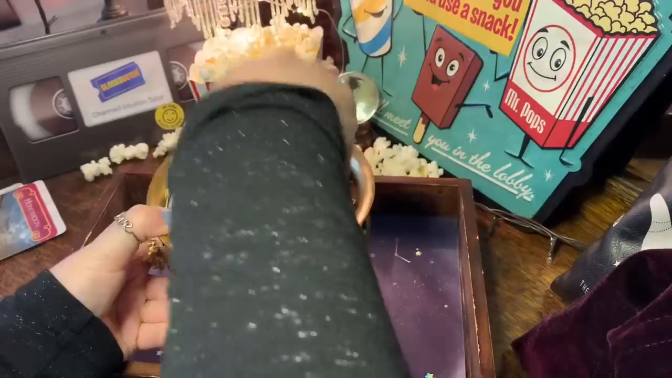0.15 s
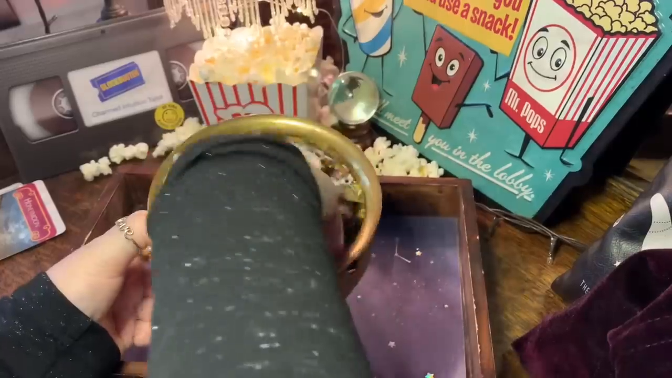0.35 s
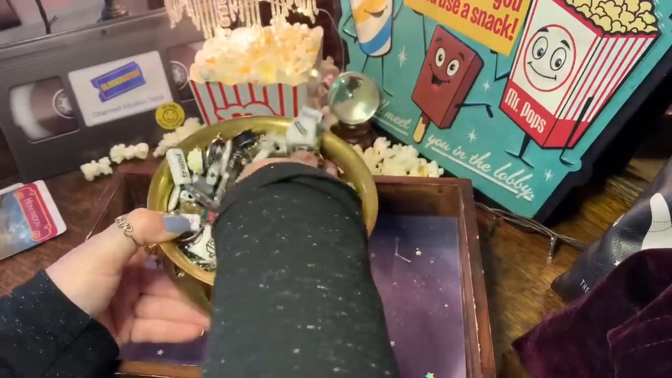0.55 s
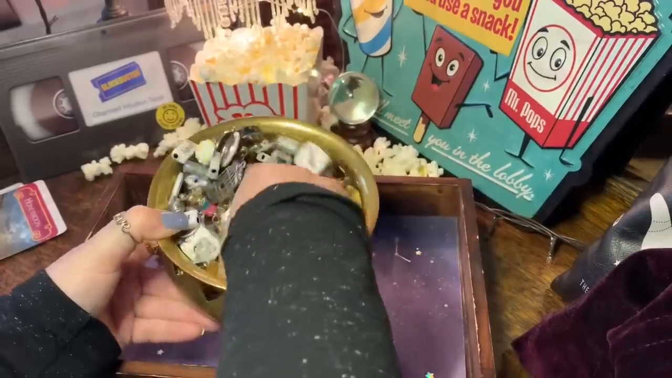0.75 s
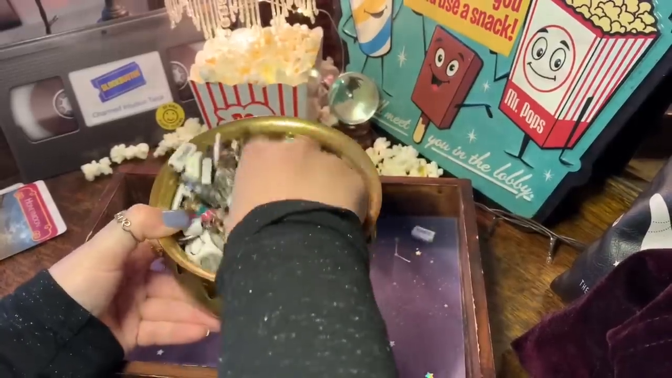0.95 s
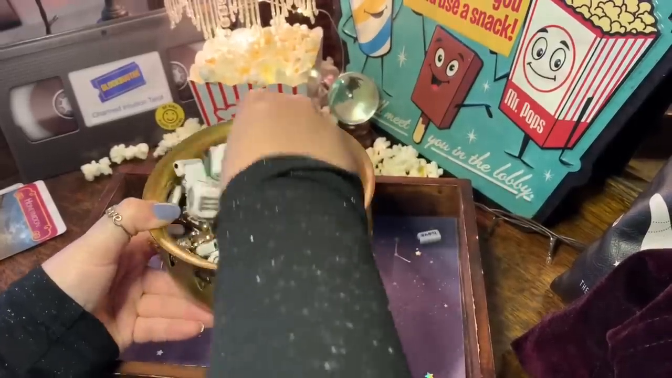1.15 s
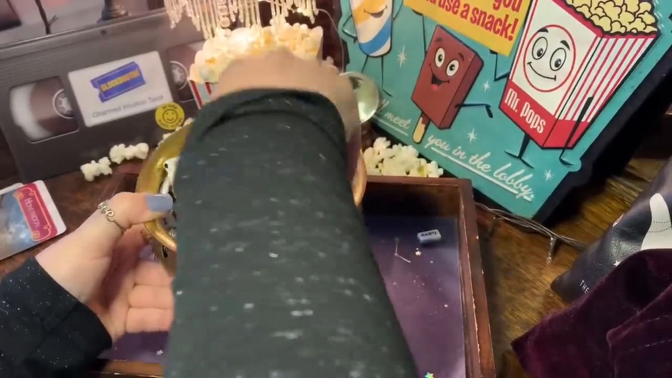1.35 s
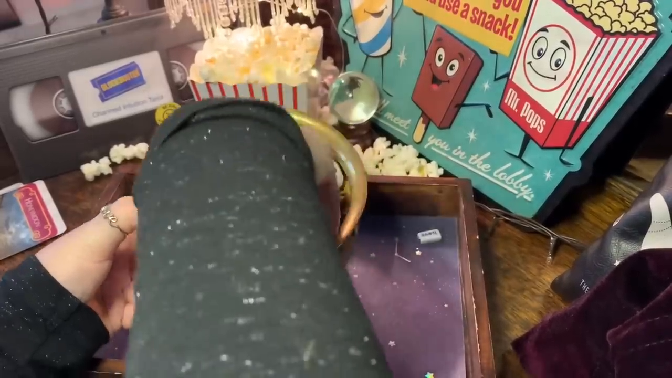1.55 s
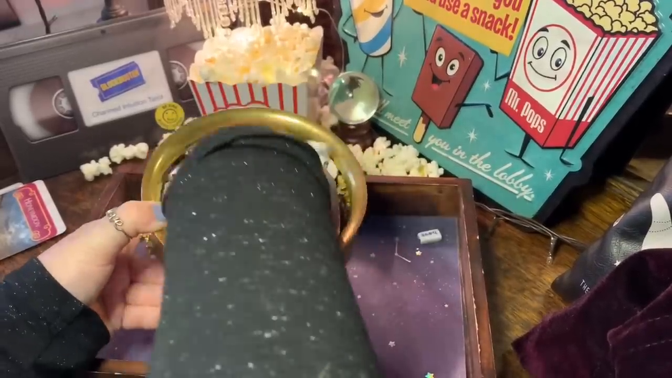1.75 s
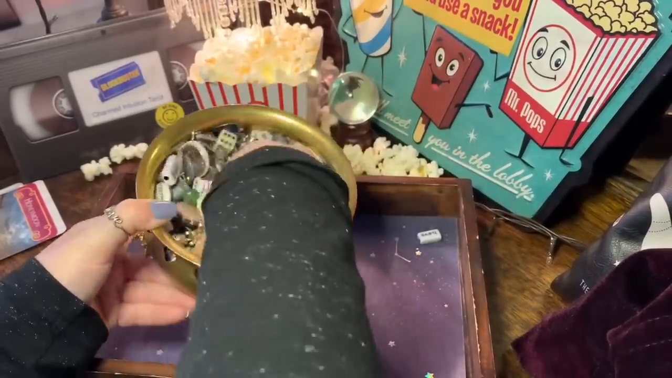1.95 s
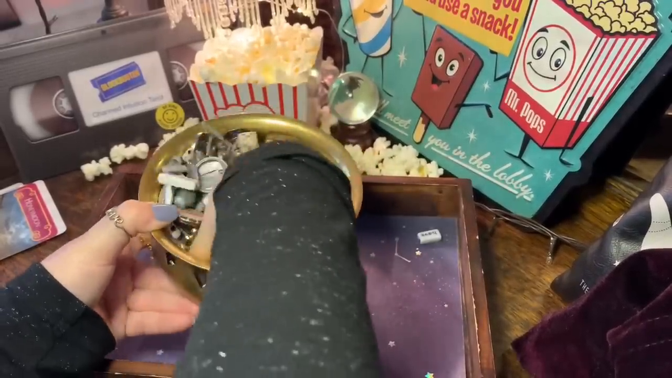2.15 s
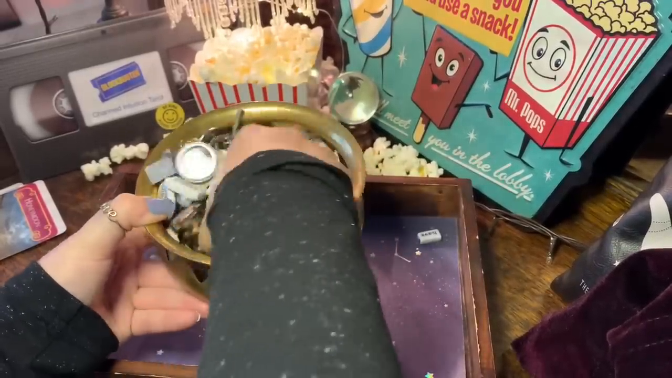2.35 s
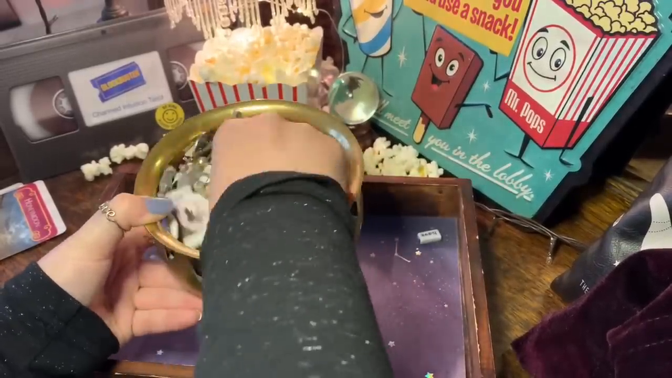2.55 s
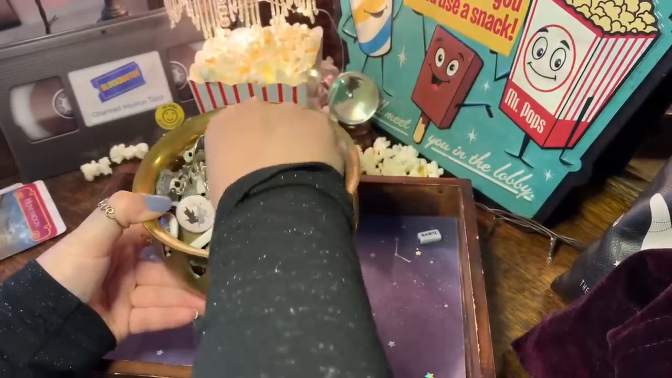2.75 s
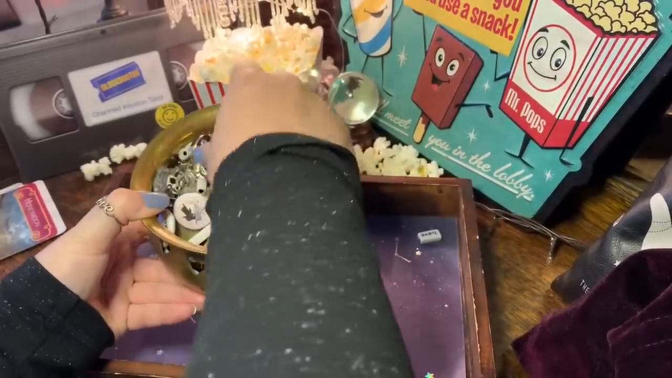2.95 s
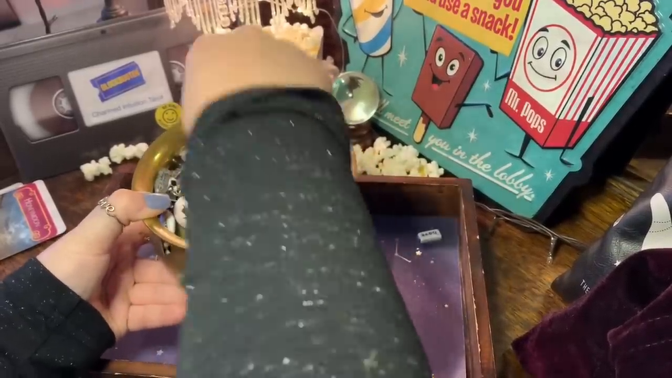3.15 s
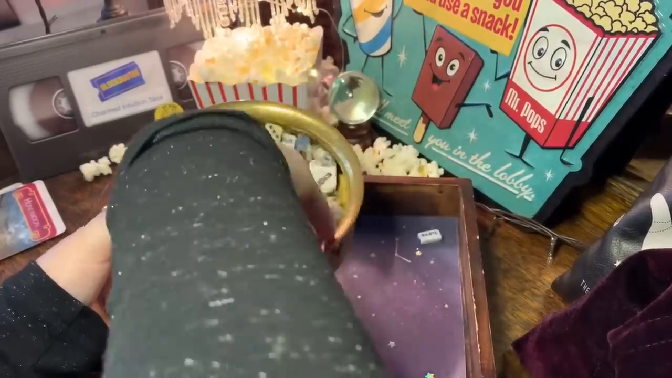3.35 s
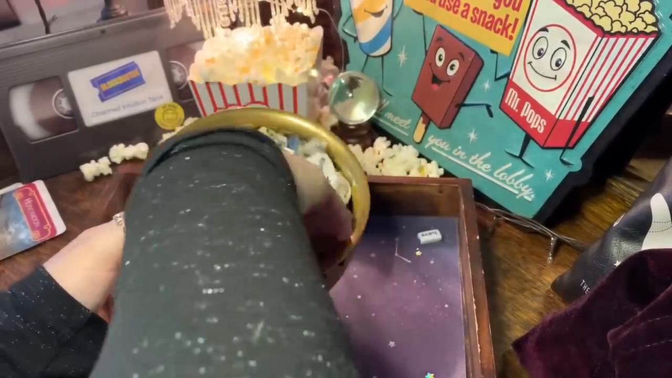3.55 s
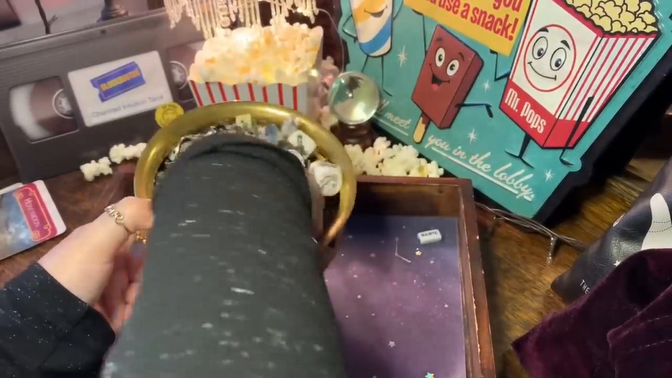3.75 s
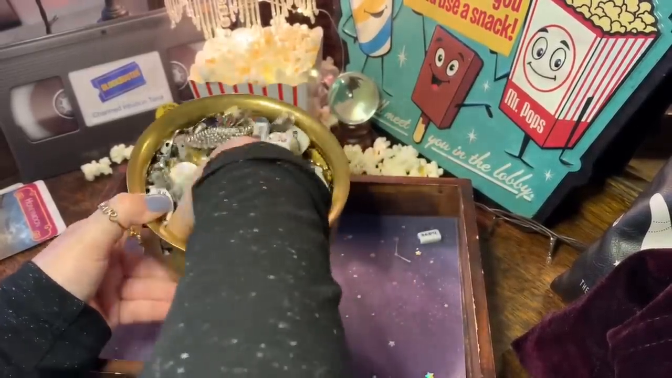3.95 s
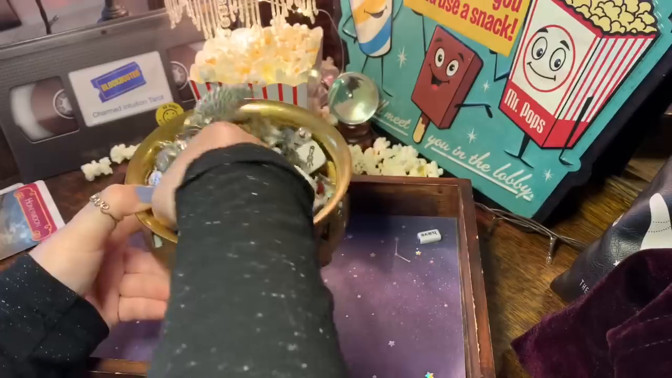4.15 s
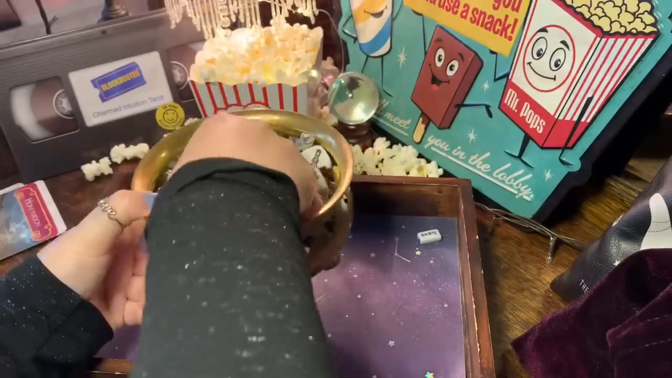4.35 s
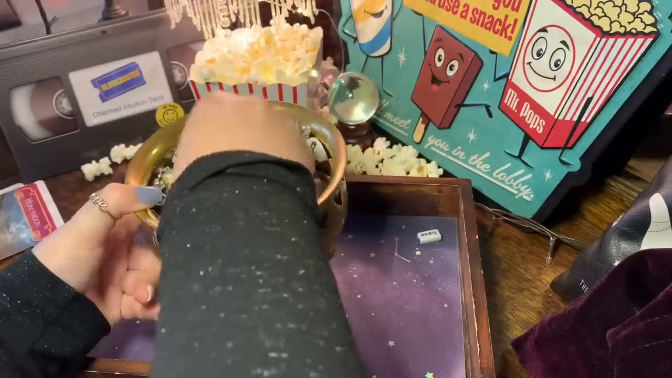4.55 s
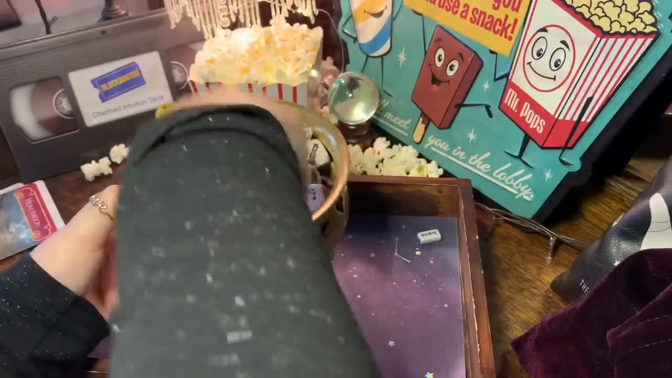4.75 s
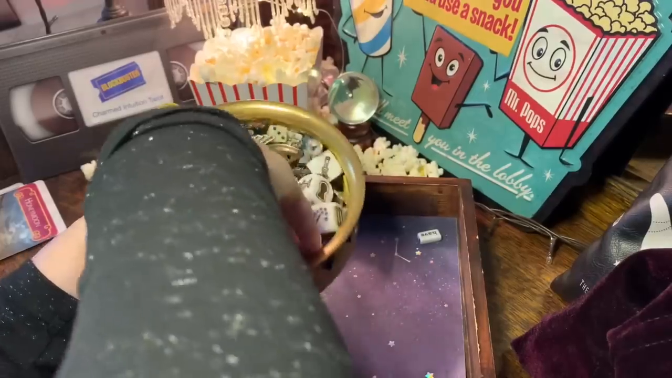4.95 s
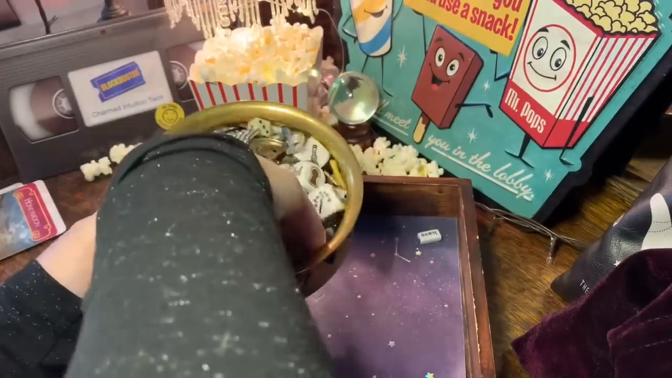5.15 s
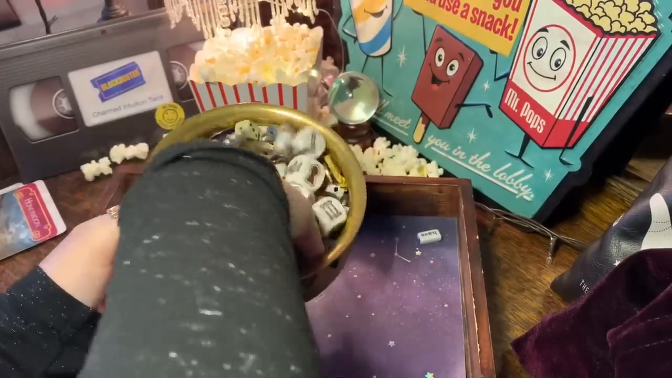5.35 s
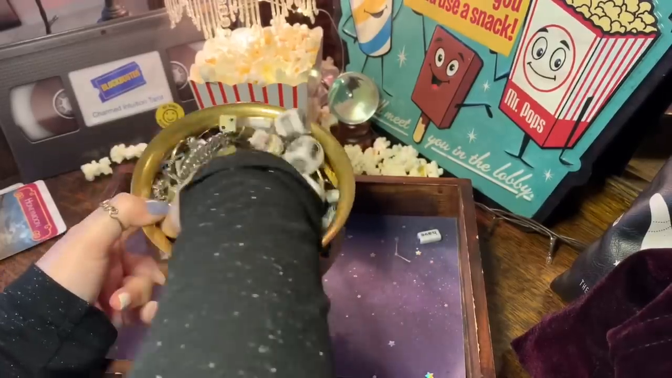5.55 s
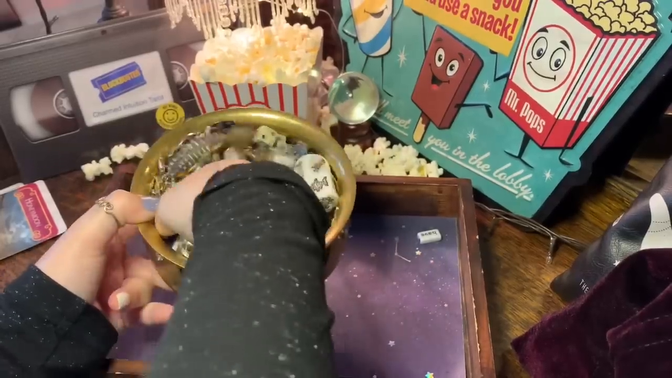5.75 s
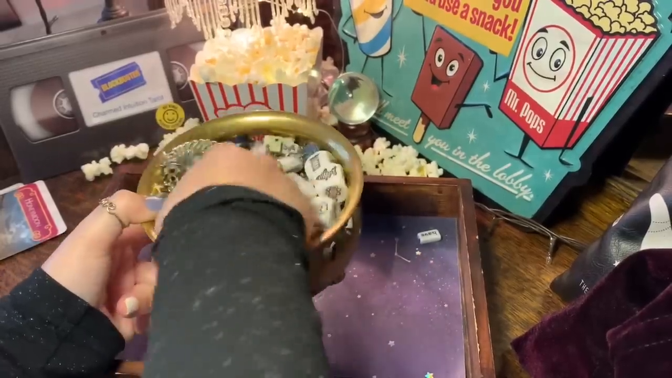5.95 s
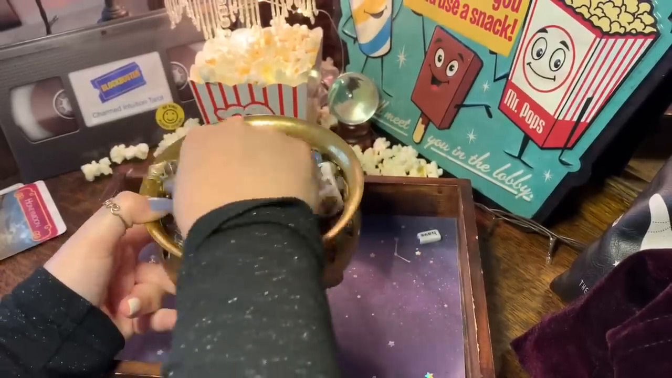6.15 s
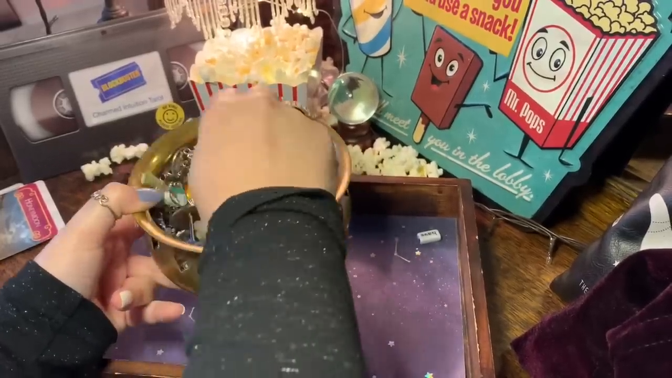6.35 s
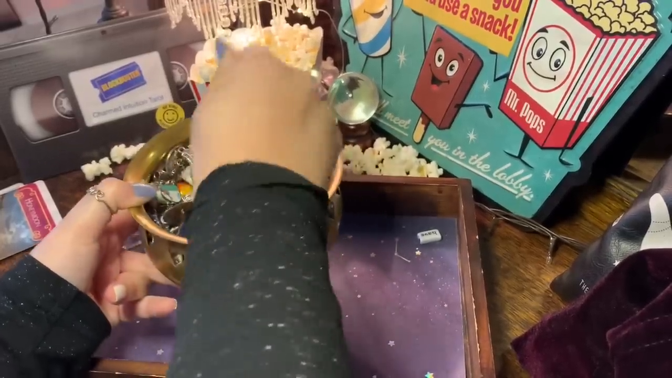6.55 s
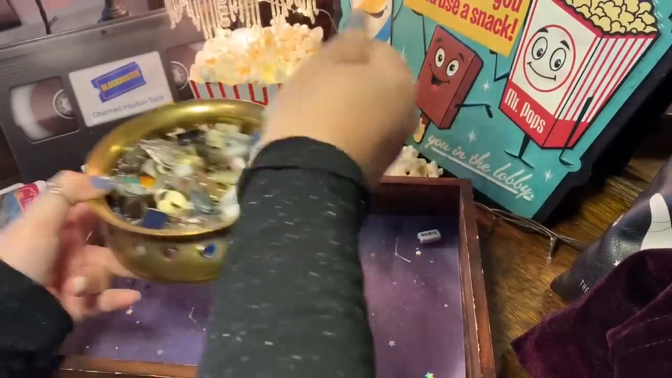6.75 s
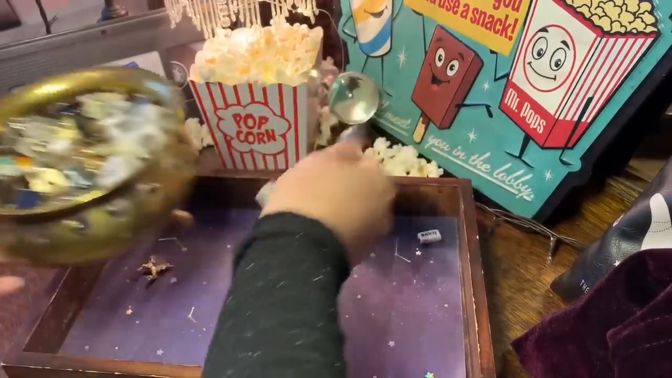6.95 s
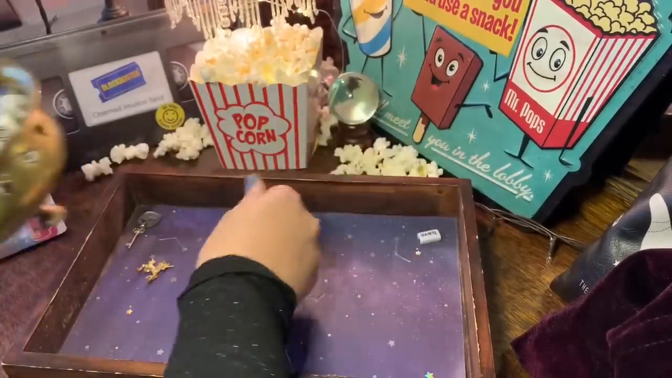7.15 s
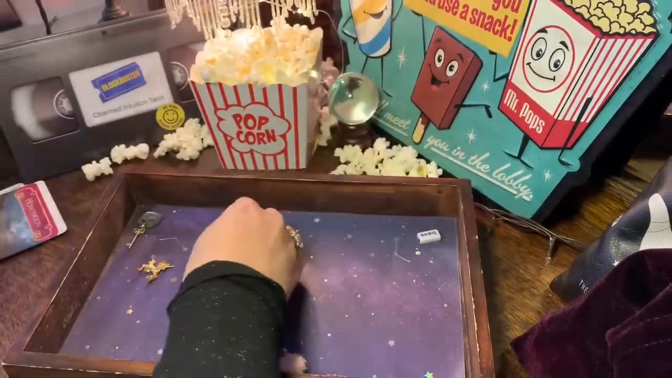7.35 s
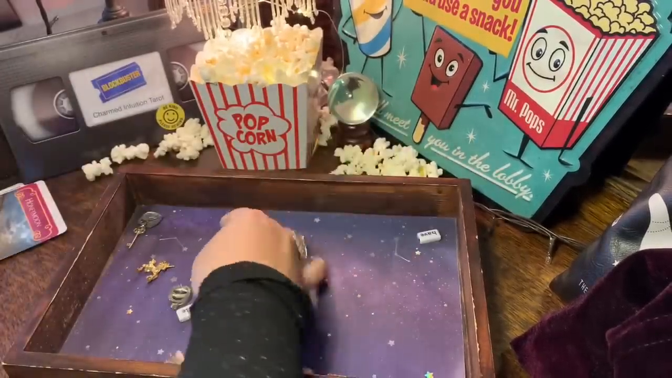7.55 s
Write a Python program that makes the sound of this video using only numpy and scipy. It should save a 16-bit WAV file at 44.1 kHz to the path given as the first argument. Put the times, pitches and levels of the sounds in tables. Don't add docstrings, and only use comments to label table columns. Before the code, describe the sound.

Close up in a quiet room, a hand churns a heap of small metal charms and tiles in a brass bowl. Continuous bright, shimmering jangle surges with uneven strokes, punctuated by sharp clinks and duller clacks. A few strays thud softly on a wooden tray midway. The stirring stops abruptly, leaving faint room hum, then a handful drops onto the felt-lined tray in a brief clatter.

```python
import sys
import numpy as np
from scipy import signal
from scipy.fft import rfft, irfft, next_fast_len
from scipy.io import wavfile

SR = 44100
rng = np.random.default_rng(int(sys.argv[2]) if len(sys.argv) > 2 else 0)


def nominal_scale(level):
    x = np.asarray(level, float) / 20
    return 10 ** x


def int16_out(signal):
    q = np.round(np.clip(np.atleast_2d(signal).T, -1, 1) * 32767)
    wavfile.write(sys.argv[1], SR, q.astype(np.int16))


N = 336041

# peak time in seconds, level in dB,
# seconds to rise 10 dB, seconds to fall 10 dB, lead of tiles over charms in dB.
HANDFUL_PUSHES = [
    (6.444, -38.5, 0.006, 0.062, -4.5),
    (7.13, -43.5, 0.0044, 0.2, 4.5),
    (7.24, -34.5, 0.038, 0.063, 0.5),
    (7.41, -29.5, 0.047, 0.085, -6),
]
TILES_DB, TILES_FOLLOW = -4, 0.4


def rms_one(x):
    return x / np.sqrt(np.mean(x ** 2) + 1e-20)


def levelled(sound, strength):
    return sound * np.sqrt(np.mean(strength ** 2) / np.mean(sound ** 2))


def in_time(rows):
    s, *columns = np.transpose(rows)
    return [np.interp(np.arange(N) / SR, s, c, -120, -120) for c in columns]


def at_hz(points, hz):
    f, values = np.array(points)[:, 0], np.array(points)[:, 1]
    return np.interp(np.log(hz), np.log(f), values)


def add(out, s, sound):
    i = round(s * SR)
    out[:, i:i + sound.shape[1]] += sound[:, :N - i]


def drift(rate):
    r = np.exp(-80 * np.pi * rate / SR)
    slow = signal.lfilter([1], [1, -2 * r, r * r], rng.standard_normal(N // 40 + 2002))[2000:]
    return np.interp(np.arange(N) / 40, np.arange(len(slow)), rms_one(slow))


def ring(clicks, hz, t60):
    r, w = nominal_scale(-60 / (t60 * SR)), 2 * np.pi * hz / SR
    return signal.lfilter([0, np.sin(w)], [1, -2 * r * np.cos(w), r * r], clicks + 1e-18)


def body(clicks, modes):
    return sum(nominal_scale(db) * ring(clicks, hz, t60) for hz, db, t60 in modes)


def heap(clicks, spectrum, cycles, count):
    pitches = np.geomspace(spectrum[0][0], spectrum[-1][0], count) * rng.uniform(0.95, 1.006, count)
    t60s = cycles / pitches * np.exp(0.27 * rng.standard_normal(count))
    dealt = rng.integers(0, 9, N)
    piles = [clicks * (dealt == k) * nominal_scale(2.5 * drift(9)) for k in range(9)]
    total = 0
    for k, (hz, t60) in enumerate(zip(pitches, t60s)):
        level = nominal_scale(at_hz(spectrum, hz)) * np.sqrt(hz / t60)
        total = total + ring(piles[k % 9], hz, t60) * level
    return total


def collisions(per_s, spread_db, clump_db):
    born = rng.random((2, N)) < per_s / SR
    sizes = nominal_scale(spread_db * np.minimum(rng.exponential(1, (2, N)), 4)) * rng.choice([-1, 1], (2, N))
    return rms_one(born * sizes * nominal_scale(clump_db * drift(43)))


def dry_edge(clicks, low_hz=3200, high_hz=15000):
    return signal.sosfilt(signal.butter(2, [low_hz, high_hz], "band", fs=SR, output="sos"), clicks)


def burst(length_s, decay_s):
    t = np.arange(int(length_s * SR)) / SR
    contacts = rng.standard_normal((2, len(t))) * nominal_scale(3.9 * rng.standard_normal(len(t)))
    envelope = np.exp(-t / decay_s) * (1 - np.exp(-t / (0.6 * decay_s)))
    return rms_one(contacts * envelope) / np.sqrt(len(t))


def pushes(rows, offset_db, follow):
    t = np.arange(0, N + 32, 32) / SR
    power = 0
    for s, db, rise_s, fall_s, lean_db in rows:
        drop_db = 10 * np.maximum((s - t) / max(rise_s, 0.002), (t - s) / max(fall_s, 0.01))
        power = power + nominal_scale(2 * (db + offset_db + follow * lean_db - drop_db))
    return np.interp(np.arange(N) / SR, t, np.sqrt(power))


def hand_in():
    hand_out_s, stop_db_per_s = 6.39, 300
    return nominal_scale(-stop_db_per_s * np.maximum(np.arange(N) / SR - hand_out_s, 0))


def stirring(offset_db, follow):
    # peak time in seconds, level in dB, seconds to rise 10 dB,
    # seconds to fall 10 dB, how hard the hand bears on the bowl in dB.
    strokes = [(.035, -26.5, .4, 0.075, -4.5), (.275, -25, 0.07, 0.24, -2.5), (.458, -26.5, 0.03, 0.08, -4),
               (.7, -26, 0.14, 0.0858, 4.5), (.92, -23, 0.09, 0.15, -1.5), (1.24, -28.5, 0.04, 0.07, -6.5),
               (1.56, -27, 0.1, 0.07, -1), (1.63, -35, 0.04, 0.06, -1.5), (1.91, -23, 0.0261, 0.11, 3.5),
               (2.1, -25, 0.0455, -0.03, 2), (2.26, -26, 0.0457, 0.1, 3.5), (2.42, -27, 0.1242, 0.32, 4),
               (2.96, -25.5, -0.01, 0.12, -3), (3.35, -25, 0.07, 0.07, 2), (3.54, -26.5, 0.05, 0.17, 1.5),
               (3.71, -25, 0.02, 0.16, 1.5), (4.04, -24, 0.11, 0.25, -0.5), (4.42, -34.5, 0.34, 0.1, -2.5),
               (4.6, -32, 0.15, 0, 1), (4.855, -30, 0.07, 0.07, 7), (5.15, -35.5, 0.1, 0.5, 2),
               (5.28, -31, 0.03, 0.15, 1.5), (5.395, -22.5, 0.0153, 0.29, -1),
               (6.0, -25, 0.2049, 0.11, 1.5), (6.25, -32.5, 0.07, 0.17, -5.5)]
    rustle = nominal_scale(-50.5 + offset_db)
    return hand_in() * np.hypot(pushes(strokes, offset_db, follow), rustle)


def all_slumps():
    # time in seconds, peak in dB, charms in relative dB, bowl in relative dB.
    hard_slumps = [(.017, -29, 2, -17), (.391, -20, 7, -36.5), (.4433, -16, -3.5, -32.5),
                   (.5751, -15, -9, -9), (.6405, -2, -17, -37.5), (.7524, -5, -22, -40.5),
                   (.844, -12.5, -13, -31), (1.129, -15.5, 4, -34), (1.327, -23, 2.5, -28),
                   (1.4326, -12, -13, -26), (1.8938, -18.5, -2, -4), (2.145, -17, -5.5, -38.5),
                   (2.652, -11.5, -13.5, -7.5), (2.9397, -12, -4, -11.5), (3.0436, -15, -5.5, -40.5),
                   (3.2015, -17.5, 0, -19.5), (3.6952, -3.5, -10.5, -12), (3.7569, -13.5, -2.5, -32),
                   (4.296, -18, -2.5, -23.5), (4.5293, -4, -14, -29), (4.7112, -17, -9.5, -34.5),
                   (4.9312, -15.5, -4, -39), (5.039, -8, -11.5, -32), (5.1335, -4.5, -10.5, -14),
                   (5.5752, -16.5, -7, -24.5), (6.1905, -29, 6.5, -33.5), (6.2287, -17.5, 4.5, -18),
                   (6.338, -25.5, -0.5, -6.5), (6.4296, -13.5, -15.5, -35), (7.036, -36, 4.5, -44)]
    # time in seconds, peak in dB.
    slips = [(.5013, -23), (.539, -21.5), (.8726, -15.5), (1.05, -15), (1.223, -23.5), (1.409, -27),
             (1.5176, -23), (1.547, -18), (1.597, -19.5), (1.695, -32), (1.801, -25.5), (2.045, -17),
             (2.2268, -13), (2.357, -17), (2.974, -13.5), (3.325, -17.5), (3.493, -25), (3.5243, -17),
             (3.7828, -11.5), (3.868, -23), (3.922, -13), (3.974, -14), (4.1055, -28), (4.2577, -19),
             (4.3939, -25), (4.413, -16.5), (4.5875, -15), (4.6804, -24.5), (4.805, -18), (4.968, -12.5),
             (5.085, -33.5), (5.2644, -17), (5.291, -19), (5.379, -11), (5.69, -16.5), (5.787, -23),
             (6.116, -17.5), (6.136, -23.5), (6.3, -15), (6.4405, -10.5), (6.6205, -34.5), (7.092, -43)]
    # time in seconds, peak in dB, charms in relative dB.
    spill = [
        (7.1193, 2.5, -38),
        (7.163, -7, -13),
        (7.218, -0.5, -25.5),
        (7.2736, -11, -12.5),
        (7.3366, -13, -16),
        (7.363, -6, -23),
        (7.3846, -12, -5.5),
        (7.407, -5, -7),
        (7.5125, -14.5, -14.5),
    ]
    charms_db, bowl_db, spill_bowl_db = -9, -20, -30
    return hard_slumps + [(s, db, charms_db, bowl_db) for s, db in slips] + [(*row, spill_bowl_db) for row in spill]


def slumps(column, t60):
    out = np.zeros((1, N))
    t = np.arange(SR // 3) / SR
    rise_s = 0.005
    for row in all_slumps():
        rel_db = row[column] if column else 0
        strength = nominal_scale(row[1] + rel_db - 60 * t / t60) * np.minimum(t / rise_s, 1)
        add(out, row[0] - rise_s / 2, strength[None])
    return out[0]


def tinkles(strength, low_hz, span_hz, count):
    out, t = np.zeros((1, N)), np.arange(SR // 11) / SR
    for when, pitch, size, lasting in rng.random((count, 4)):
        hz = low_hz + span_hz * pitch ** 0.45
        t60 = (0.03 + 0.14 * lasting ** 2) * (0.35 + 0.9 * pitch)
        note = np.sin(2 * np.pi * hz * t) * nominal_scale(-60 * t / t60)
        level = strength[int(when * N * 0.99)] * nominal_scale(-9 * size)
        add(out, when * N / SR * 0.99, (level * note)[None])
    return out


def stirred_charms():
    # frequency in Hz, level in dB.
    charm_spectrum = [(7300, -15.5), (8200, 6), (10000, 2.5), (12000, 0.5), (14000, 2), (15600, -9)]
    fine = collisions(6000, spread_db=3.6, clump_db=1.3)[0]
    strength = stirring(0, 0) + pushes(HANDFUL_PUSHES, 0, 0) + nominal_scale(-3.0) * slumps(column=2, t60=0.044)
    ringing = levelled(heap(fine * strength, charm_spectrum, 260, count=90), strength)
    ticks = levelled(dry_edge(collisions(500, spread_db=3.5, clump_db=3.0) * strength), strength)
    lone = tinkles(strength, low_hz=3980, span_hz=11680, count=1500)
    return nominal_scale(3.0) * ringing + nominal_scale(-9) * ticks + nominal_scale(3.0) * lone


def stirred_tiles(coarse):
    # frequency in Hz, level in dB.
    tile_spectrum = [(1300, -15.5), (2000, -5.5), (3000, -0.5), (4000, 1), (5000, 2), (6200, -2.5),
                     (7400, -2)]
    heap_strength = stirring(TILES_DB, TILES_FOLLOW)
    held_strength = pushes(HANDFUL_PUSHES, 11, 0.8)
    still = nominal_scale(-72.5)
    strength = heap_strength + held_strength + still + nominal_scale(-13.5) * slumps(column=0, t60=0.064)
    ringing = levelled(heap(coarse * strength, tile_spectrum, 96, count=56), strength)
    lone = tinkles(heap_strength, low_hz=1202, span_hz=5310, count=600)
    return nominal_scale(-3.5) * ringing + nominal_scale(1.5) * lone


def bowl(coarse):
    # frequency in Hz, level in dB, 60 dB decay time in seconds.
    bowl_modes = [(626, -17.5, 0.037), (1000, -15.5, 0.035), (1028.3, -1.5, 0.062), (1089.4, 0.5, 0.05),
                  (1255, -5.5, 0.03), (1690, -10, 0.053), (1958, -2, 0.048), (2488, -12, .05),
                  (2870, -15.5, 0.031)]
    strength = stirring(-16.5, 0.96) + pushes(HANDFUL_PUSHES[1:], -3, 1) + nominal_scale(-2.0) * slumps(column=3, t60=0.046)
    blows = 0.76 * coarse + collisions(260, spread_db=3.5, clump_db=1.5)
    hold = nominal_scale(4.2 * drift(16.2))
    return nominal_scale(4.0) * levelled(body(blows * strength * hold, bowl_modes), strength)


def stirred():
    coarse = collisions(1300, spread_db=4.8, clump_db=2.2)
    return stirred_charms() + stirred_tiles(coarse) + bowl(coarse)


def slump_cracks():
    out = np.zeros((2, N))
    snap_db, clack_db = -14, -15.5
    for s, db, charm_db, bowl_db in all_slumps():
        knock = 8 * burst(0.016, 0.0063)
        add(out, s, nominal_scale(db + charm_db + snap_db) * dry_edge(knock))
        add(out, s, nominal_scale(db + clack_db) * dry_edge(knock, low_hz=2200, high_hz=5200)[:1])
        hit = np.pad(burst(0.0025, 0.002)[:1], ((0, 0), (0, SR // 16)))
        chime = sum(ring(hit, hz, 0.04) for hz in rng.uniform(7900, 16000, 6))
        add(out, s, nominal_scale(db + charm_db - 25) * chime)
    return out


def single_notes():
    # start in seconds, frequency in Hz, level in dB, 60 dB
    # decay time in seconds.
    note_rows = [(0.016, 11450, -17, 0.063), (0.032, 9830, -18, 0.15), (.6405, 3890, -6, .012),
                 (.6478, 4030, -7, .014), (0.7537, 3000, -9.5, 0.013), (1.128, 8190, -7, 0.051),
                 (1.131, 6940, -23.5, 0.059), (1.225, 9950, -16.5, 0.11), (1.253, 9810, -17.5, 0.2),
                 (1.236, 12170, -19, 0.22), (1.28, 11950, -22.5, 0.22), (1.329, 11300, -20.5, 0.077),
                 (1.895, 8400, -12.5, .07), (2.146, 8500, -20, .04), (3.045, 8600, -18.5, .07),
                 (3.049, 4593, -41.5, 2.4), (3.2, 12300, -23.5, 0.41), (3.695, 1690, -22, 0.055),
                 (3.696, 2580, -17, 0.029), (4.189, 1600, -22.5, 0.041), (4.309, 1630, -23.5, 0.04),
                 (4.258, 4140, -26.5, 0.051), (4.532, 4800, -26.5, 0.073), (4.532, 1730, -28.5, 0.058),
                 (6.23, 14800, -19, 0.15), (6.441, 14795, -22, 0.18), (6.546, 7000, -41, .05),
                 (6.876, 7070, -60, .06)]
    out = np.zeros((2, N))
    t = np.arange(SR // 2) / SR
    beat_hz, caught_s = 37, 0.21
    for s, hz, db, t60 in note_rows:
        envelope = nominal_scale(db - 60 * t / t60 - 400 * np.maximum(t - caught_s, 0)) * np.minimum(t / 0.0014, 1)
        twins = np.sin(2 * np.pi * hz * t) + 0.26 * np.sin(2 * np.pi * (hz + beat_hz) * t)
        add(out, s, (envelope * twins)[None])
    return out


def struck(rows, note_db, crack_db, t60, width):
    out, t = np.zeros((2, N)), np.arange(SR // 8) / SR
    for s, db, hz in rows:
        near, lasting = rng.normal(0, 1, 2), rng.uniform(0.6, 2.0)
        neighbours = np.sin(2 * np.pi * hz * (1 + 0.06 * near[:, None]) * t).sum(0)
        note = (np.sin(2 * np.pi * hz * t) + 0.5 * neighbours) * nominal_scale(-60 * t / (t60 * lasting))
        add(out, s, nominal_scale(db + note_db) * note[None] * np.minimum(t / 0.0014, 1))
        crack = dry_edge(6 * burst(0.008, 0.0013)[:1], low_hz=hz / width, high_hz=min(hz * width, 17000))
        add(out, s, nominal_scale(db + crack_db) * crack)
    return out


def knocks():
    # time in seconds, peak in dB, frequency in Hz.
    tile_clinks = [(0.2439, -26, 4680), (0.3901, -19, 7000), (0.4504, -15.5, 6400), (0.5387, -27, 6660),
                   (0.641, -5.5, 4070), (0.6475, -6, 4110), (0.7538, -9.5, 2820), (0.845, -11, 2800),
                   (1.0466, -23, 6250), (1.1304, -18, 7050), (1.2057, -26.5, 4120), (1.4322, -27, 2270),
                   (1.4322, -26, 6950), (1.5454, -20.5, 4060), (1.5674, -22.5, 4700), (1.8014, -31, 4870),
                   (1.8862, -24.5, 6910), (1.8956, -20.5, 7500), (2.0378, -23, 6950), (2.1461, -19.5, 4000),
                   (2.2257, -23.5, 6670), (2.2369, -21, 4030), (2.36, -19, 3540), (2.9193, -27.5, 5070),
                   (2.941, -21.5, 4100), (3.0141, -23.5, 6460), (3.045, -20, 4080), (3.2007, -27.5, 7000),
                   (3.3269, -20, 6900), (3.4946, -25.5, 3140), (3.6967, -20, 2550), (3.6965, -18.5, 7100),
                   (3.7573, -17.5, 4030), (4.2565, -21.5, 4220), (4.296, -19, 6800), (4.3521, -24, 2310),
                   (4.3965, -26.5, 1860), (4.4144, -19, 2220), (4.5306, -16.5, 4840), (4.7117, -23, 7000),
                   (4.8546, -21.5, 4100), (4.9312, -21, 6950), (5.04, -21.5, 7200), (5.1363, -21.5, 6250),
                   (5.1365, -10.5, 2490), (5.264, -24, 7350), (5.3792, -24, 6550), (5.3792, -18.5, 4300),
                   (5.424, -15, 6650), (5.5773, -19.5, 3950), (5.8666, -33, 4900), (6.117, -23, 6560),
                   (6.1789, -27.5, 7000), (6.1914, -23.5, 6550), (6.231, -18.5, 7180), (6.3, -23, 7160),
                   (6.3405, -29.5, 7390), (6.4293, -8, 3900)]
    # time in seconds, peak in dB, frequency in Hz.
    charm_clinks = [(0.0159, -11, 11170), (0.2458, -21, 10400), (0.392, -4.5, 11700), (0.4439, -16, 10500),
                    (0.5023, -17.5, 10300), (0.5387, -18, 11700), (0.5751, -18, 11600),
                    (0.6454, -17.5, 11200), (0.6918, -14.5, 11300), (0.7716, -17, 10400),
                    (0.827, -22, 10500), (0.841, -15, 10300), (0.8734, -14.5, 10160),
                    (1.1293, -10.5, 10800), (1.2256, -11.5, 9830), (1.3279, -13, 11100),
                    (1.4082, -24, 11200), (1.4326, -19, 10500), (1.5184, -18, 11200), (1.8946, -17, 10900),
                    (2.0373, -16, 10300), (2.145, -13.5, 10900), (2.2253, -23, 10400), (2.357, -20, 11700),
                    (2.368, -15, 11300), (2.6529, -19.5, 11400), (2.9397, -16, 11200), (3.0445, -12, 14800),
                    (3.2016, -15, 12100), (3.3278, -16.5, 11300), (3.495, -22, 11700), (3.5224, -13, 10280),
                    (3.6965, -13.5, 11300), (3.701, -10.5, 11700), (3.7594, -9, 11700),
                    (3.7828, -13, 12200), (3.8666, -16, 10300), (3.922, -18.5, 10400),
                    (3.932, -17.5, 14900), (3.9744, -17, 15300), (4.1051, -16, 10300), (4.3939, -19, 11200),
                    (4.4134, -17.5, 15000), (4.5306, -14, 9940), (4.5875, -13, 10300), (4.7112, -27, 11700),
                    (4.8055, -16, 10200), (4.9312, -20, 10200), (5.0404, -20.5, 11530),
                    (5.1372, -15.5, 10250), (5.2929, -18.5, 10200), (5.3792, -17, 10500),
                    (5.4695, -10.5, 10140), (5.5762, -15.5, 11300), (6.1913, -15, 11100),
                    (6.2292, -11.5, 14900), (6.339, -21, 11200), (6.4398, -18.5, 9800),
                    (6.4403, -16.5, 14800)]
    # time in seconds, peak in dB, frequency in Hz.
    spill_clinks = [(0.7694, -8.5, 5080), (0.7794, -13.5, 2896), (6.441, -10.5, 4520), (7.1217, -6.5, 2290),
                    (7.1604, -11, 2130), (7.1672, -13.5, 1904), (7.1834, -17, 2700), (7.218, -13, 1870),
                    (7.2304, -13, 2880), (7.2444, -14.5, 3220), (7.2739, -17.5, 3280), (7.3372, -15, 2850),
                    (7.3464, -14, 2860), (7.3633, -9, 2890), (7.3891, -7, 3670), (7.4064, -11, 5310),
                    (7.4274, -14.5, 2350), (7.5126, -18.5, 3520), (7.543, -23, 1910), (7.6094, -23.5, 4070)]
    return (struck(tile_clinks, note_db=-8.0, crack_db=-0.5, t60=0.025, width=1.7)
            + struck(charm_clinks, note_db=-11.5, crack_db=-9.5, t60=0.055, width=1.25)
            + struck(spill_clinks, note_db=-9.5, crack_db=-1.5, t60=0.022, width=2.1))


def tray():
    # time in seconds, thud in dB, rap in relative dB, rap brightness in Hz.
    drops = [(0.642, -45, 25, 4200), (4.189, -14, -2.5, 1330), (4.308, -24, 5.5, 1630),
             (4.353, -29, 3, 2240), (4.394, -35, 1.5, 2050), (4.414, -37.5, 11.5, 2210),
             (4.459, -36.5, 3.5, 2000), (4.529, -45.5, 9, 1720), (6.432, -36.5, 15.5, 2560),
             (7.125, -25.5, 8.5, 2600), (7.161, -19.5, 3.5, 2010), (7.18, -20.5, 4, 1940),
             (7.219, -24, 8, 1900), (7.234, -20, 4.5, 2420), (7.245, -28, 8.5, 2580), (7.276, -28, 2, 3280),
             (7.294, -23.5, -1.5, 1650), (7.347, -20.5, -2, 2870), (7.364, -22, 3, 2990),
             (7.39, -19.5, -1.5, 3740), (7.409, -24, -5.5, 2500), (7.429, -28, 9.5, 2350),
             (7.465, -25.5, 2.5, 2280), (7.514, -22.5, -6, 3500), (7.551, -30.5, -6, 1910)]
    # time in seconds, level in dB.
    rolls = [
        [(4.17, -80.5), (4.374, -49.5), (4.498, -58), (4.62, -77.5)],
        [(7.1, -68.5), (7.172, -50.5), (7.3, -44), (7.62, -50.5)],
    ]
    # frequency in Hz, level in dB, 60 dB decay time in seconds.
    board_modes = [(170.7, -3, 0.115), (215.6, -4.5, 0.075), (310, -10, 0.07), (366, -4.5, 0.076),
                   (414, -6.5, 0.085), (621, -9.5, 0.084), (700, -12.5, 0.052), (925, -13, .05)]
    # frequency in Hz, level in dB.
    rap_spectrum = [(750, -31.5), (1000, -25.5), (1700, -5), (2600, 4), (4000, -2), (6000, -23.5)]
    soft, hard = np.zeros((2, N)), np.zeros((2, N))
    for s, db, rap_db, bright_hz in drops:
        add(soft, s + 0.00269, nominal_scale(db - 7) * np.hanning(60) / 30 * np.ones((2, 1)))
        contact = signal.butter(4, np.clip(1.15 * bright_hz, 500, 9000), fs=SR, output="sos")
        add(hard, s, nominal_scale(db + rap_db - 44.0) * signal.sosfilt(contact, burst(0.018, 0.0075)[:1]))
    rolling = collisions(1500, spread_db=2.5, clump_db=1.1) * sum(nominal_scale(in_time(rows)[0]) for rows in rolls)
    thuds = body(soft + nominal_scale(-18.0) * rolling, board_modes)
    raps = heap(hard + nominal_scale(-56) * rolling, rap_spectrum, 54, count=36)
    return thuds + raps


def bumps():
    # time in seconds, level in dB.
    soft_bumps = [
        (.037, -44),
        (.647, -29),
        (6.437, -29),
        (6.476, -35.5),
    ]
    push, contact = np.zeros((2, N)), np.hanning(int(0.0065 * SR))
    for s, db in soft_bumps:
        add(push, s, nominal_scale(db) * 2 * contact / contact.sum() * np.ones((2, 1)))
    return ring(push, 168, 0.13) + nominal_scale(-12.0) * ring(push, 180, 0.087)


def grip():
    # time in seconds, level in dB.
    grip_curve = [(0.0, -63), (0.61, -69), (0.74, -55), (0.85, -70), (1.8, -71.5), (1.93, -62.5),
                  (2.29, -57), (2.67, -74), (4.11, -62), (4.24, -56), (4.58, -76), (5.92, -63.5),
                  (6.37, -76.5), (6.49, -62), (6.96, -84.5), (7.32, -47), (7.62, -63)]
    band = signal.butter(2, [48, 75], "band", fs=SR, output="sos")
    return nominal_scale(in_time(grip_curve)[0]) * rms_one(signal.sosfilt(band, rng.standard_normal(N)))


def room(x):
    t60_s, wall_cut_hz = 0.39, 8700
    size = next_fast_len(N + SR)
    w = 2 * np.pi * np.fft.rfftfreq(size)
    dull = 1 / (1 + 1j * w * SR / (2 * np.pi * wall_cut_hz))
    lags = (rng.uniform(0.014, 0.038, 24) * SR).astype(int)
    loops = [nominal_scale(-60 * lag / SR / t60_s) * dull * np.exp(-1j * w * lag) for lag in lags]
    tails = np.array([sum(g / (1 - g) * (-1) ** k for k, g in enumerate(loops[c::2])) for c in range(2)])
    return irfft(rfft(x, size) * tails, size)[:, :N]


def room_tone():
    # frequency in Hz, density in dB per Hz.
    hum_spectrum = [(18, -49), (30, -27), (43, -23.5), (109, -5), (159, -6.5), (198, -4.5), (251, -16.5),
                    (520, -12.5), (900, -29.5), (2340, -32.5), (2460, -23), (2580, -32), (7300, -35),
                    (11000, -41), (15000, -66)]
    hz = np.maximum(np.fft.rfftfreq(N, 1 / SR), 10)
    noise = rfft(rng.standard_normal((2, N)))
    return nominal_scale(-59) * rms_one(irfft(noise * nominal_scale(at_hz(hum_spectrum, hz)), N))


def scene():
    pieces = stirred() + slump_cracks() + single_notes() + knocks()
    pieces = signal.sosfilt(signal.butter(4, 860, "high", fs=SR, output="sos"), pieces)
    near = signal.sosfilt(signal.butter(6, 147, "high", fs=SR, output="sos"), pieces + tray() + bumps())
    return near + nominal_scale(-16.0) * room(near) + room_tone() + grip()


def band_limit(x):
    return signal.sosfilt(signal.butter(12, 17090, fs=SR, output="sos"), x)


def record(dry):
    # frequency in Hz, coherence from 0 to 1.
    likeness = [(150, 0.98), (260, 0.8), (450, 0.41), (1000, 0.92), (1700, 0.1), (2800, 0.37), (3600, 0.41),
                (5500, 0.07), (7000, 0.8), (8000, 0.93)]
    # frequency in Hz, lead of the right port in radians.
    low_turn = [(330, 0), (430, 1.8), (600, 4.5), (900, 9), (1150, 6.3), (1500, 8), (1900, 4.5),
                (2500, 3.3), (3300, 3), (4100, 6.3), (5400, 9.2), (6200, 12.6)]
    # frequency in Hz, turn at the right port in radians.
    other_turn = [(2500, 1.3), (5500, 1.6)]
    port_lag_s, in_phase_hz, top_hz = 9 / SR, 11060, 15750
    size = next_fast_len(N + 4096)
    hz = np.maximum(np.fft.rfftfreq(size, 1 / SR), 10)
    left, other = rfft(dry, size) * nominal_scale(-36 * np.clip((hz - top_hz) / 250, 0, 1))
    alike = np.clip(at_hz(likeness, hz), 0, 1)
    turn = np.where(hz > low_turn[-1][0], 2 * np.pi * (hz - in_phase_hz) * port_lag_s, at_hz(low_turn, hz))
    shared = alike * left * np.exp(1j * turn)
    middle = abs(hz - 4400) < 3100
    unshared = np.sqrt(1 - alike ** 2) * other * np.exp(1j * at_hz(other_turn, hz) * middle)
    right = (shared + unshared) * nominal_scale(2.0 / (1 + (hz / 330) ** 4))
    *ports, slope = irfft(np.array([left, right, right * 2j * np.pi * hz / SR]), size)[:, :N]
    ports[1] = ports[1] + 0.18 * drift(3.4) * slope
    return band_limit(ports)


dry = scene()
out = record(dry)
int16_out(out)
```